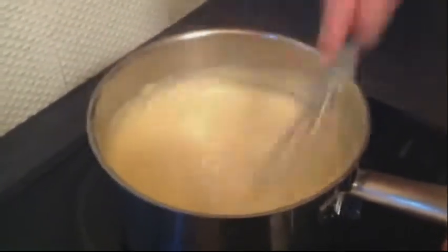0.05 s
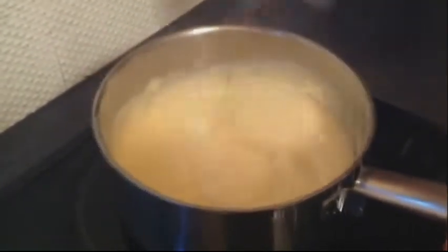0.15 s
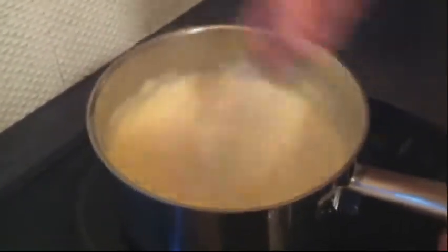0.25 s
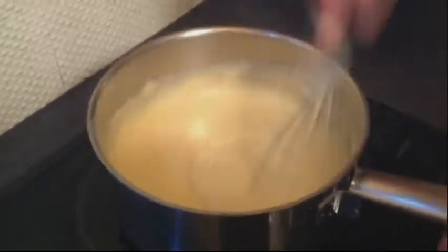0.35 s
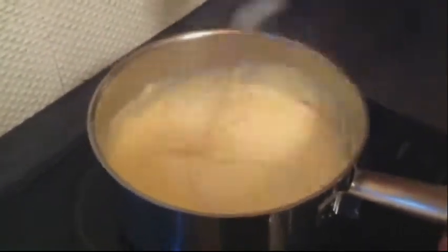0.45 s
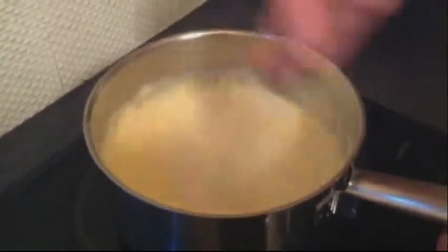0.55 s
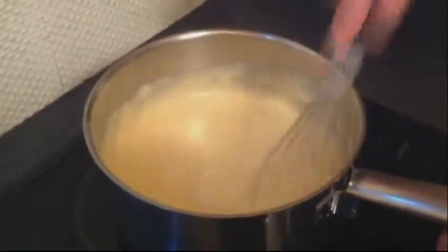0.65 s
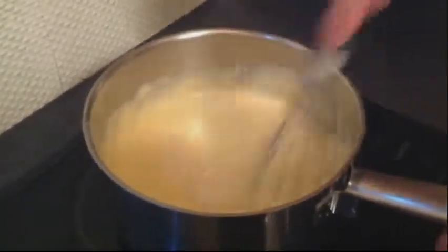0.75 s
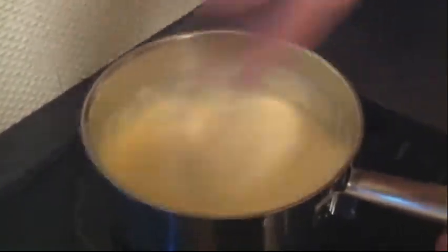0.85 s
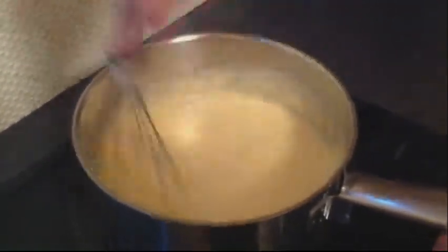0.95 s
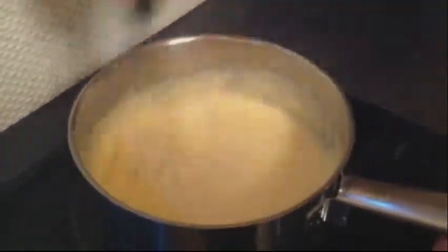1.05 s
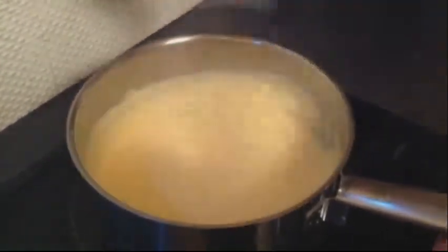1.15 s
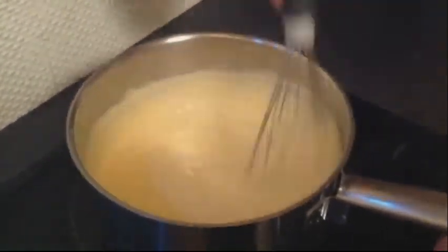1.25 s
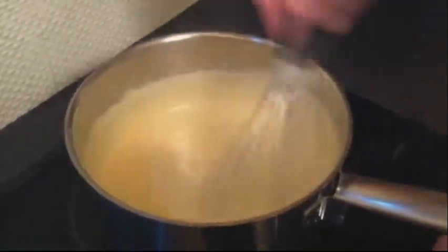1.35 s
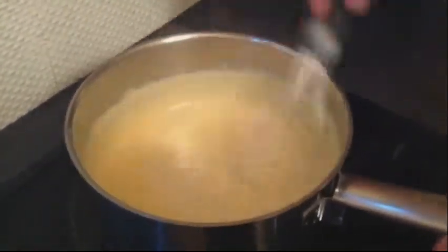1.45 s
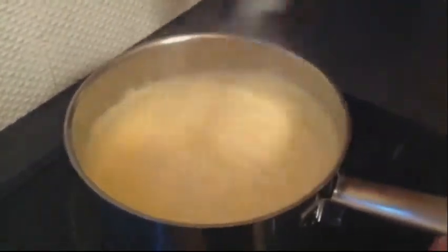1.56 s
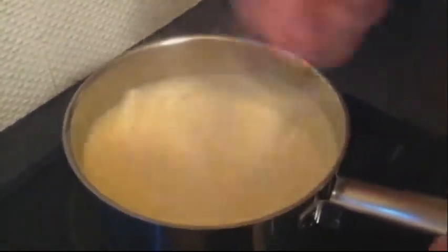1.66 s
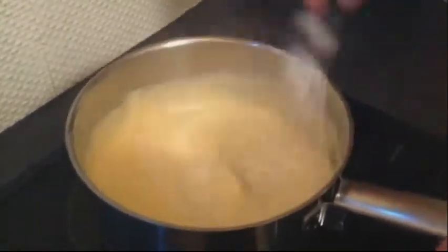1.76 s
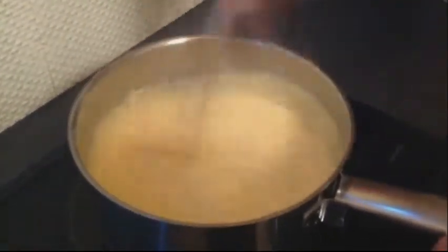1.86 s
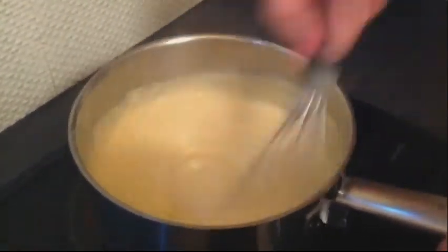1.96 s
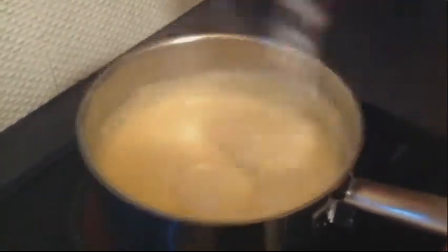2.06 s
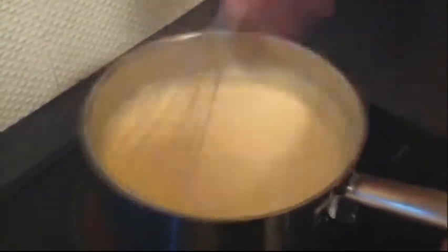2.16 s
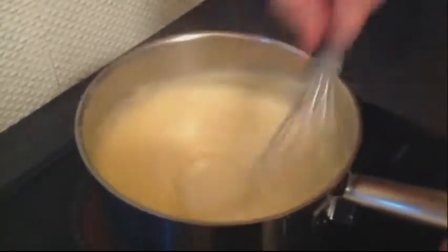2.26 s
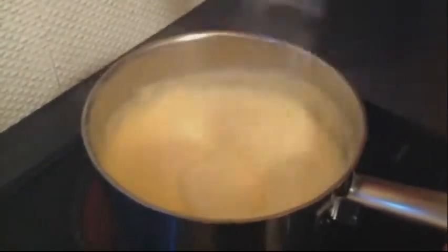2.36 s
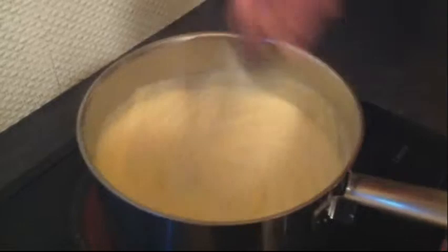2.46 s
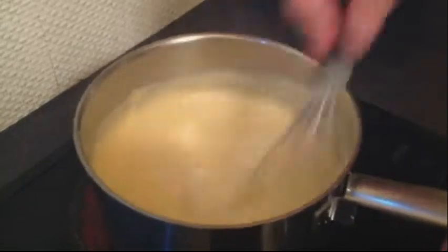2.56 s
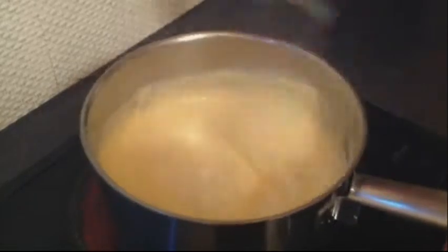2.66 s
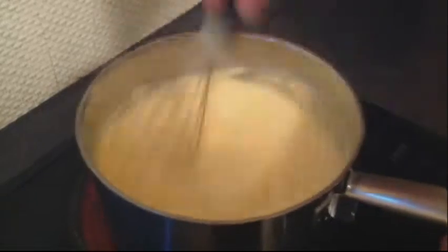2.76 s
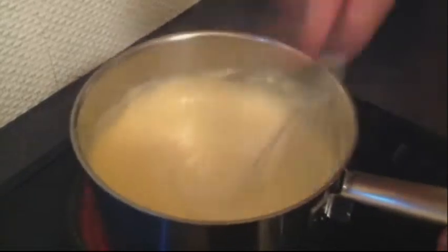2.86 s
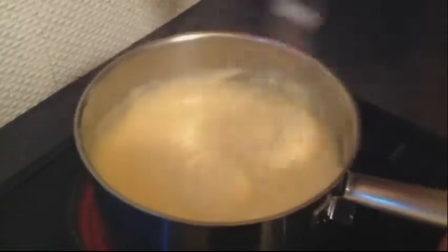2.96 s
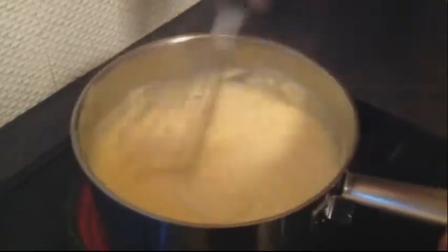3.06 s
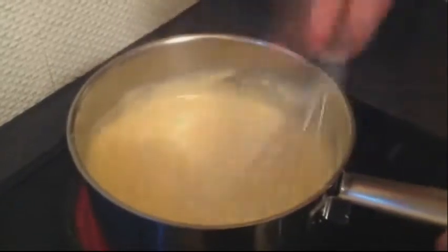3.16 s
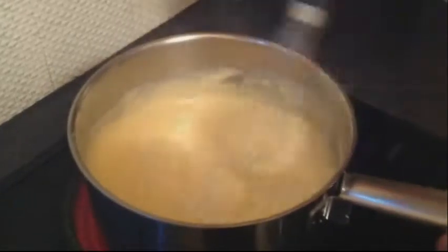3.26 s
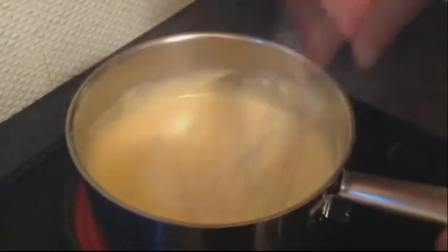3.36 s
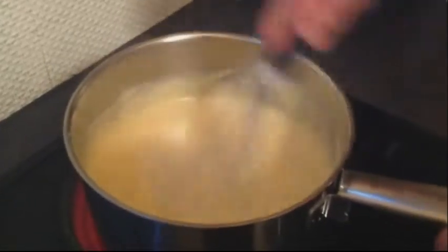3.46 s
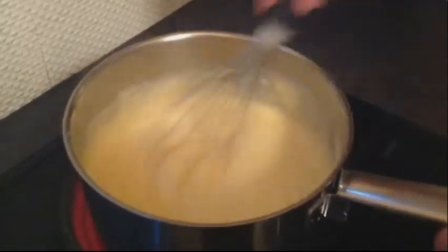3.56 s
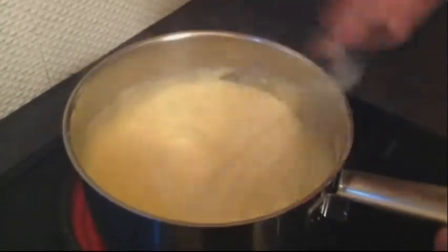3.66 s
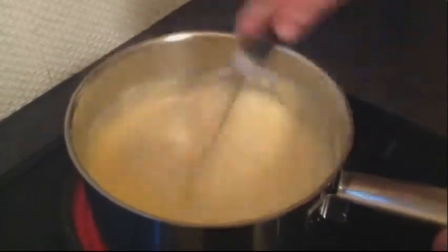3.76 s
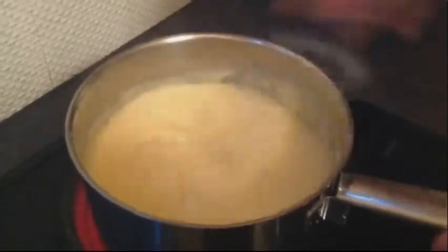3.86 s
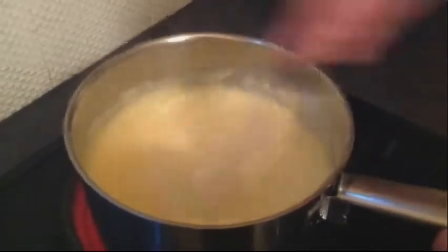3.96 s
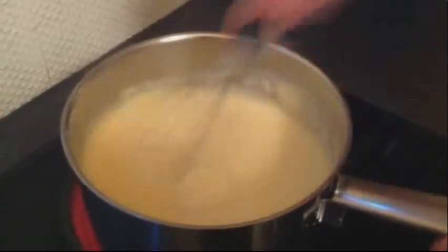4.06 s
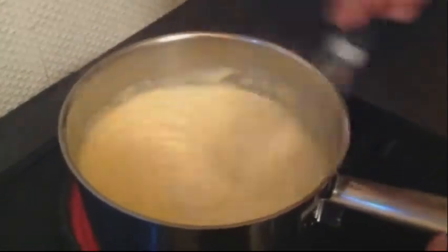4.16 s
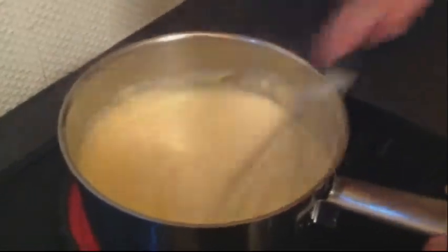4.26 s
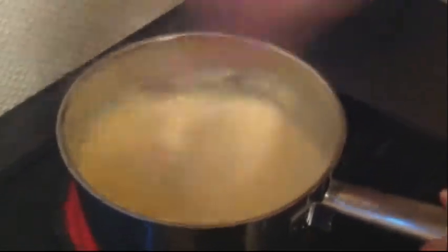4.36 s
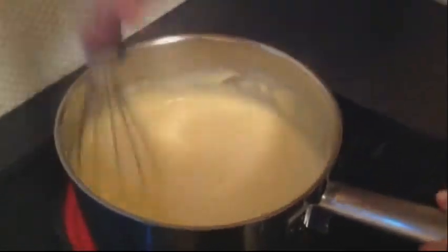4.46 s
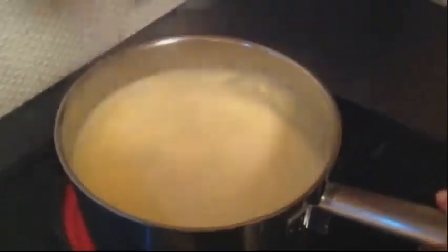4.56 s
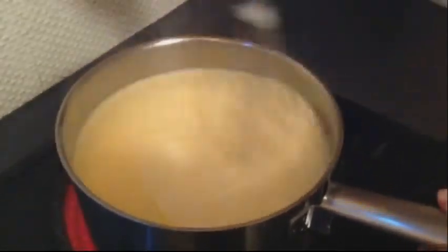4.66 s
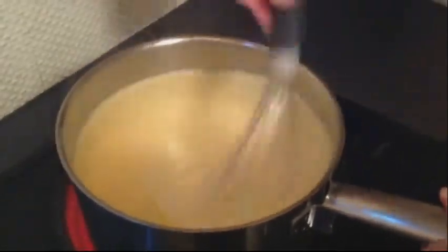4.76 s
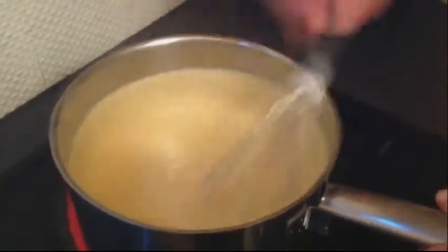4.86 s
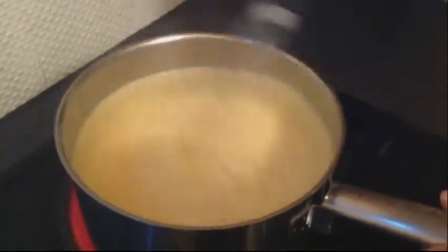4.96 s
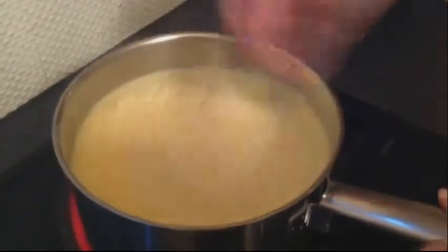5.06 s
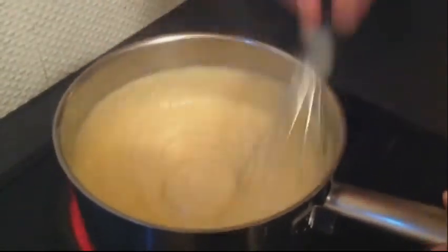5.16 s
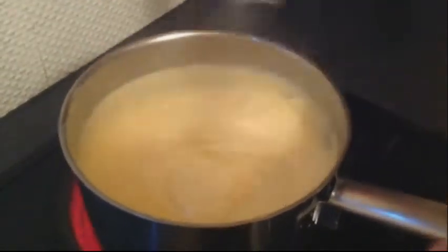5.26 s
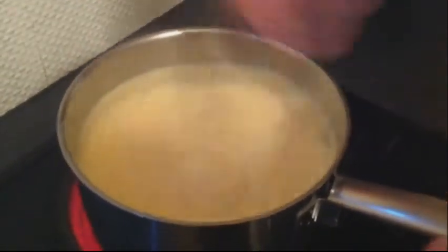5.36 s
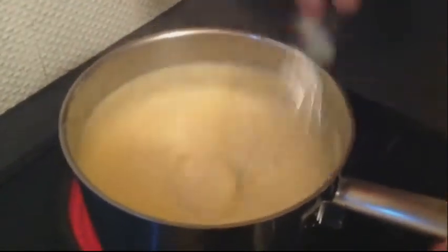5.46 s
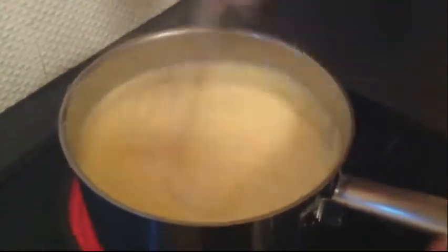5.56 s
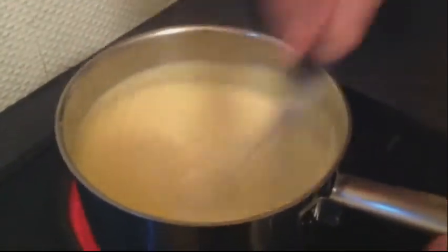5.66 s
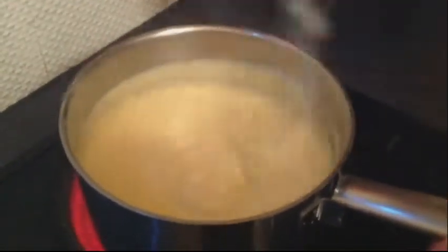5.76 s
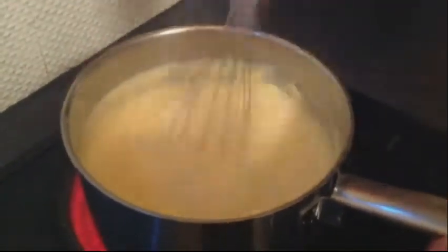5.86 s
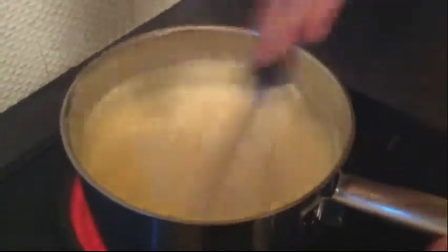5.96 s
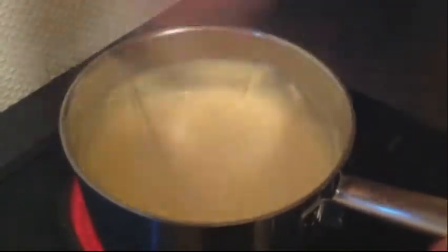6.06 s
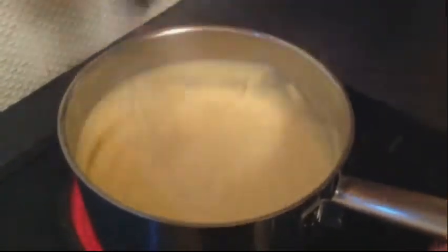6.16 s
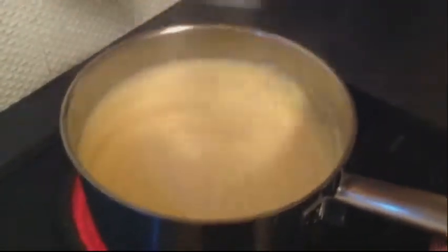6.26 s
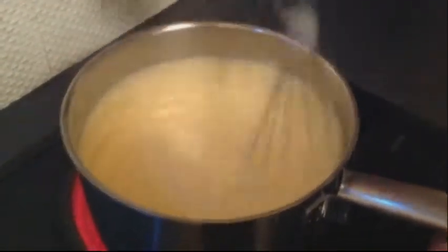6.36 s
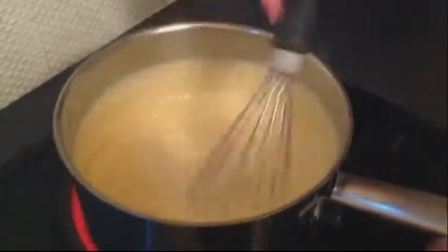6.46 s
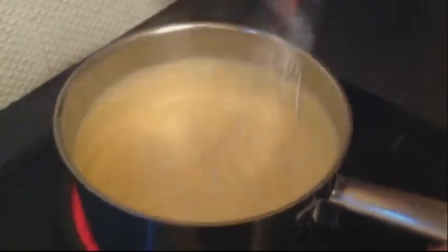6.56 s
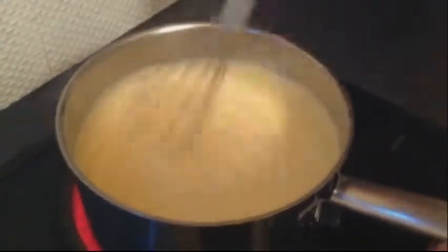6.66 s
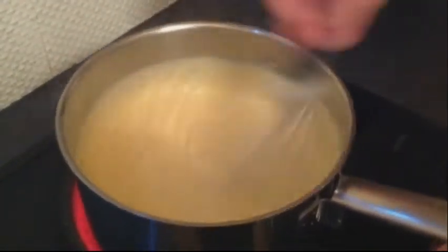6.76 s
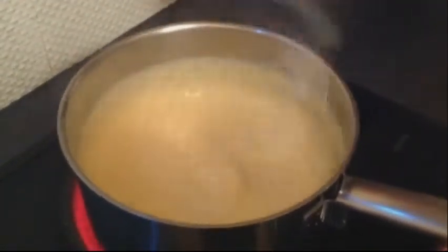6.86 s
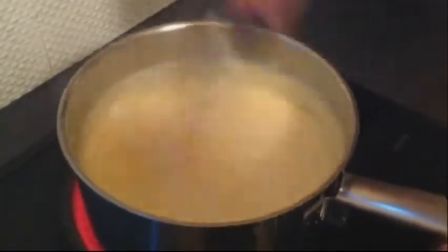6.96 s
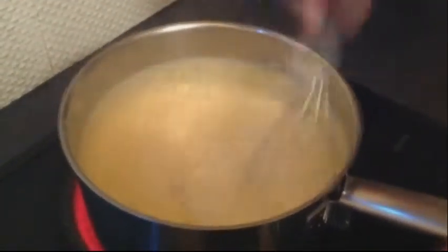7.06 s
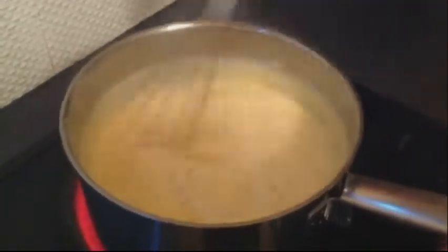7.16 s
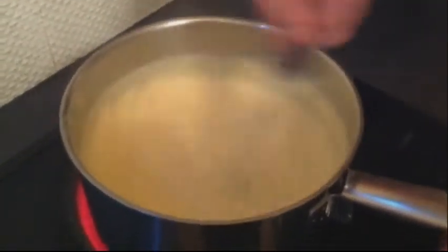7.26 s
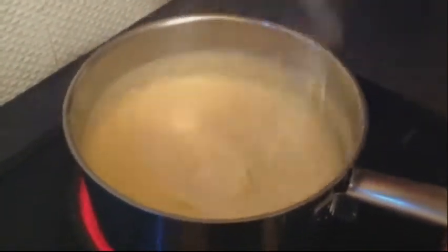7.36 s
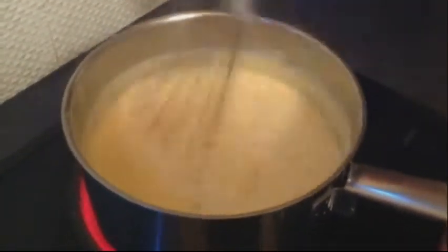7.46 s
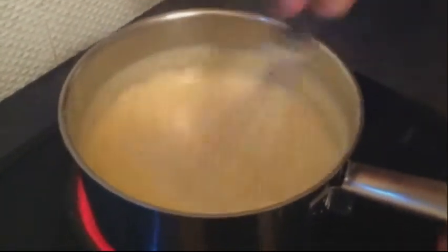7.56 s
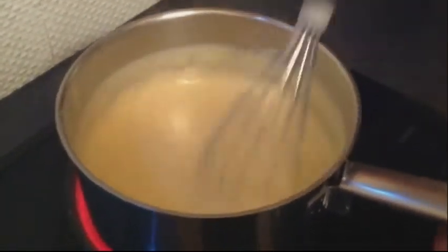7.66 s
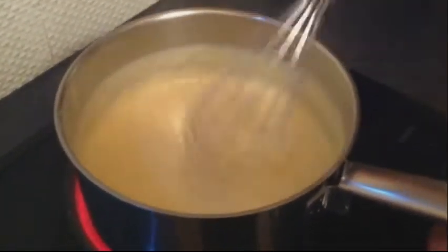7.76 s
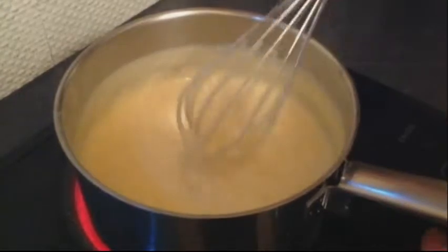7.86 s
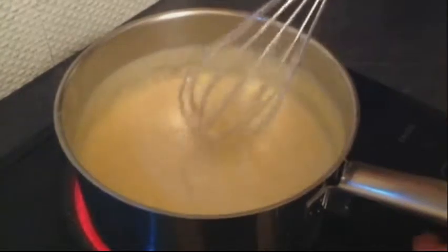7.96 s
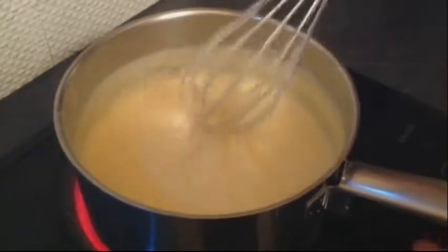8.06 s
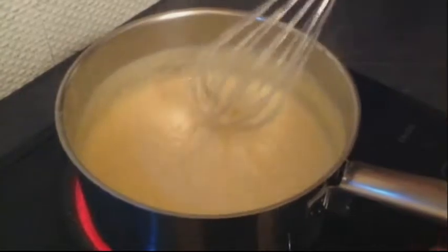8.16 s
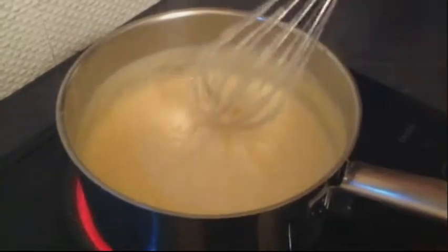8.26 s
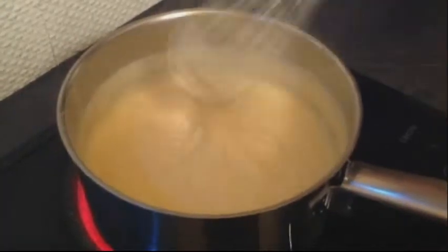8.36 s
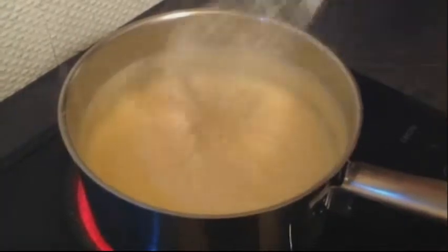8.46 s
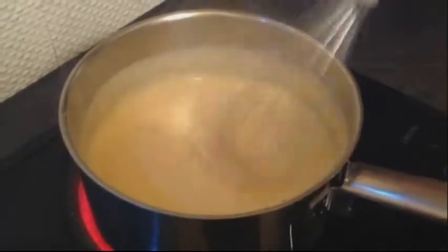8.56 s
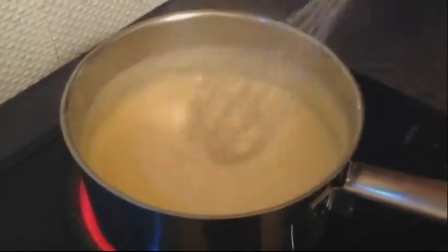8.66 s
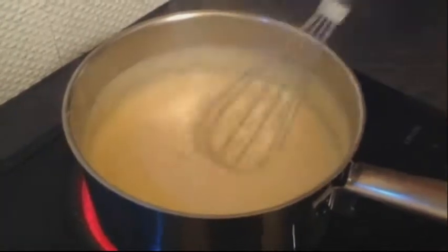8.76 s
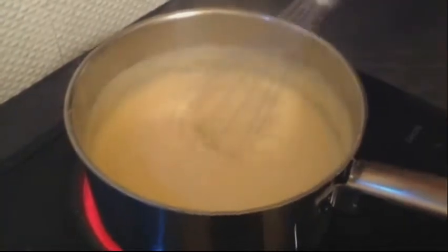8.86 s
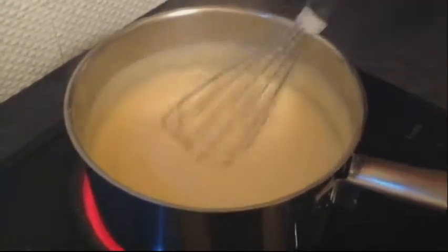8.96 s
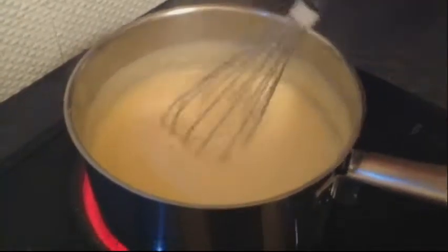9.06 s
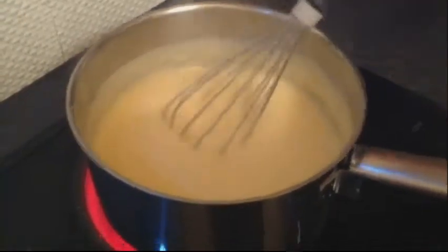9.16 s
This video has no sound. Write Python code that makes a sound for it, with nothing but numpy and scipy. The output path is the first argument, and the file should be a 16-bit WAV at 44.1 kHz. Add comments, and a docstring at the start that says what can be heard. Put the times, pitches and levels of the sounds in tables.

```python
"""A wire whisk beats thick cream in a steel saucepan on a glass hob, close by in a small kitchen.
Impacts excite the modes of the wires and the damped pan; sliding friction hisses along the bottom.
The cream churns, air pockets resonate in it as they close, and once the pan knocks on the hob.
Then the whisk is lifted: a soft scuff, the hum of the kitchen, and the whisk is set down in the pan,
where its wires vibrate freely. The room adds a short reverberation."""
import sys
import numpy as np
from scipy import signal
from scipy.fft import rfft, irfft, next_fast_len
from scipy.io import wavfile
from scipy.ndimage import uniform_filter1d, map_coordinates

SR = 44100
rng = np.random.default_rng(int(sys.argv[2]) if len(sys.argv) > 2 else 0)


def digitize_waveform(pressure):
    """Quantize a signal to 16-bit integers and store it at the path in sys.argv[1].

    Rows of a 2-D input are taken as channels; values are limited to [-1, 1].
    """
    field = np.atleast_2d(pressure).T
    bounded = np.clip(field, -1, 1)
    quanta = np.round(bounded * 32767).astype(np.int16)
    wavfile.write(sys.argv[1], SR, quanta)


N = 406594

# Wire impacts on the pan, in relative levels: (time [s], clack [dB], rim [dB], body [dB])
IMPACTS = [(0.0074, -14, -35, -30), (0.0977, -7.5, -26.5, -31.5), (0.268, -16.5, -44, -35),
           (0.2976, -13.5, -51, -37), (0.3789, -8.5, -27, -39), (0.3945, -17, -45, -45),
           (0.5747, -8.5, -33, -30), (0.662, -10, -23.5, -30), (0.8196, -28, -40, -54),
           (0.8495, -21, -39, -43), (0.8659, -17.5, -46, -42), (0.8736, -16.5, -29, -35),
           (0.913, -9, -25, -58), (0.962, -20.5, -30, -46), (1.0211, -8, -29, -36),
           (1.291, -23, -31.5, -53.5), (1.3777, -20.5, -49.5, -41.5), (1.3992, -22, -31.5, -60),
           (1.5018, -20, -29, -44), (1.545, -21.5, -63.5, -39.5), (1.6521, -10.5, -44, -30.5),
           (1.6823, -19, -59, -40), (1.779, -4, -18.5, -33), (1.827, -15, -40, -52), (1.926, -5, -25, -29),
           (2.0294, -5.5, -23.5, -30.5), (2.1103, -11, -32, -39.5), (2.1956, -8, -41.5, -29),
           (2.253, -17, -39, -37.5), (2.3038, -14, -50, -40), (2.3178, -11, -34.5, -37.5),
           (2.391, -14.5, -30, -49.5), (2.521, -6.5, -51, -29), (2.595, -6.5, -28, -32),
           (2.8029, -14, -63, -32.5), (2.837, -12.5, -58, -34), (2.9206, -6.5, -24, -35),
           (2.9394, -14, -31, -50), (3.102, -27.5, -40, -54), (3.246, -6.5, -28.5, -35),
           (3.3025, -17.5, -29.5, -49), (3.488, -4, -31.5, -29.5), (3.4976, -15, -21.5, -30),
           (3.9736, -14.5, -31, -47), (4.0157, -9, -29, -33), (4.2525, -15, -34, -57),
           (4.283, -19.5, -43, -50), (4.3099, -22, -31, -60), (4.3273, -19, -41, -44),
           (4.3824, -9.5, -52, -34), (4.3918, -10.5, -27.5, -35), (4.43, -10, -37, -57),
           (4.4668, -12.5, -50, -57), (4.4801, -12, -42, -36.5), (4.725, -18, -39, -43.5),
           (4.854, -18.5, -34, -45.5), (5.0854, -8.5, -32, -33), (5.2065, -16, -48, -40),
           (5.2757, -16, -24.5, -46.5), (5.3696, -10.5, -46, -33.5), (5.473, -4.5, -26, -31.5),
           (5.655, -6.5, -32.5, -33), (5.742, -7, -25.5, -32), (6.0168, -0.5, -20.5, -29.5),
           (6.0195, -7.5, -24.5, -45.5), (6.1229, -19, -38, -64), (6.1591, -15, -39, -47),
           (6.3721, -21, -46.5, -48), (6.4913, -27, -45, -51), (6.6278, -21.5, -28.5, -43),
           (6.7303, -13, -37.5, -36.5), (6.8639, -5.5, -24.5, -33.5), (7.0241, -9.5, -45, -32),
           (7.1054, -5.5, -21.5, -29.5), (7.2739, -12, -43, -37.5), (7.3777, -10, -27.5, -36.5),
           (7.9833, -43, -69, -58)]
# Modes of the pan, damped by the cream: (frequency [Hz], bandwidth [Hz], gain [dB])
RIM_MODES = [(1178, 20, -3), (1420, 260, 2), (1534, 52, 4.5), (1857, 54, 0.5), (2044, 46, 10),
             (2475, 340, 2), (2820, 170, 3)]
WALL_MODES = [(511, 30, -5), (602, 40, 4.5), (674, 55, 4.5), (782, 83, 3.5), (967, 170, -4.5)]
BOTTOM_MODES = [(143, 22, -1.5), (191, 37, -5.5), (289.4, 23.5, 3), (339.4, 30, -0.5), (444, 32, -6)]
# Spectral envelope of a wire clack: (frequency [Hz], gain [dB])
CLACK_SPECTRUM = [(300, -43), (1000, -16), (2300, -14), (3300, -5.5), (3900, -2), (4600, 0), (5300, -3),
                  (6100, -3), (7600, 0.5), (8600, -2.5), (9700, -5.5), (10800, -8), (15000, -11)]
BAND_LIMIT_HZ = 15400
LEAD_SAMPLES = 110  # light grazing before a strike lands


def amp(db):
    """Decibels to amplitude ratio."""
    return 10 ** (np.asarray(db) / 20)


def unit(x):
    """Normalise to rms 1."""
    return x / np.sqrt(np.mean(x ** 2) + 1e-20)


def unit_onset(x, samples):
    """Normalise each row to rms 1 over its first samples."""
    return x / np.sqrt(np.mean(x[..., :samples] ** 2, axis=-1, keepdims=True))


def along(points, hz):
    """Interpolate (frequency [Hz], value) points on a logarithmic frequency axis."""
    frequencies, values = np.transpose(points)
    return np.interp(np.log(hz + 1), np.log(frequencies + 1), values)


def fade(t, t60):
    """Exponential decay, 60 dB down after t60."""
    return np.exp(-np.log(1000) * t / t60)


def swell(start, attack, hold, t60):
    """An envelope with a linear rise, a plateau until hold and an exponential decay, all in seconds."""
    t = np.maximum(np.arange(N) / SR - start, 0)
    return np.minimum(t / attack, 1) * fade(np.clip(t - hold, 0, 2 * t60), t60)


def wobble(rate):
    """Smooth random modulation, rate knots a second."""
    return map_coordinates(rng.standard_normal(int(N * rate / SR) + 4), [np.arange(N) * rate / SR])


def sparse(rate, spread_db):
    """A Poisson train of unequal impulses, rate a second."""
    occurs = rng.random(N) < rate / SR
    return occurs * amp(spread_db * np.clip(rng.standard_normal(N), -2, 2)) * rng.choice([-1, 1], N)


def add(track, time, sound):
    """Superpose a sound on the track at a time in seconds."""
    start = max(round(time * SR), 0)
    part = track[start:start + len(sound)]
    part += sound[:len(part)]


def filtered(x, response):
    """Multiply the spectrum of x by a frequency response."""
    n = x.shape[-1]
    padded = 2 * next_fast_len(n // 2 + 4096)
    return irfft(rfft(x, padded) * response(np.fft.rfftfreq(padded, 1 / SR)), padded)[..., :n]


def coloured(x, points):
    """Minimum-phase filtering through (frequency [Hz], gain [dB]) points."""
    def response(hz):
        cepstrum = irfft(np.log(amp(along(points, hz))))
        half = len(cepstrum) // 2
        cepstrum[1:half] *= 2
        cepstrum[half + 1:] = 0
        return np.exp(rfft(cepstrum))
    return filtered(x, response)


def resonated(x, modes):
    """Forced vibration: x drives parallel second-order resonators of alternating polarity."""
    def response(hz):
        return sum((-1) ** k * amp(db) * 1j * hz * width / (centre ** 2 - hz ** 2 + 1j * hz * width)
                   for k, (centre, width, db) in enumerate(modes))
    return filtered(x, response)


def ring(modes, t):
    """Free vibration: a sum of damped sinusoids of random phase."""
    return sum(amp(db) * fade(t, t60) * np.sin(2 * np.pi * (hz * t + rng.random()))
               for hz, db, t60 in modes)


def patchy(x, depth_db, bins=3):
    """Spectral modulation: drifting peaks and dips of the given width."""
    spectra = signal.stft(x, nperseg=512)[2]
    field = uniform_filter1d(rng.standard_normal(spectra.shape), size=bins, axis=0)
    field = uniform_filter1d(field, size=14, axis=1)
    return signal.istft(spectra * amp(depth_db * unit(field)), nperseg=512)[1][:N]


def strikes():
    """Impact excitation: the wires clack, and their brief chatter drives the rim, wall and bottom."""
    t = np.arange(SR // 9) / SR
    clack = clacks(len(IMPACTS), t)
    chatter = rng.standard_normal(clack.shape) * fade(t, 0.026)
    rim = unit_onset(resonated(chatter, RIM_MODES), samples=500)
    wall = unit_onset(resonated(chatter, WALL_MODES), samples=600)
    bottom = unit_onset(resonated(chatter, BOTTOM_MODES), samples=900)
    out = np.zeros(N)
    for k, (time, clack_db, rim_db, body_db) in enumerate(IMPACTS):
        # A strike under the cream muffles the rim and shifts the sound from wall to bottom.
        lean_db = 2.5 - 0.172 * (body_db - rim_db)
        body = amp(body_db + lean_db - 7) * wall[k] + amp(body_db - lean_db - 6) * bottom[k]
        add(out, time + 0.0005 - LEAD_SAMPLES / SR, amp(clack_db - 11) * clack[k])
        add(out, time, amp(rim_db - 10) * rim[k] + body)
    return out


def clacks(hits, t, modes=420):
    """Convolution: each contact of a chattering loop repeats its impulse response, a crack and a ring."""
    wire_hz = (np.arange(modes) + rng.random(modes))[:, None] / modes * BAND_LIMIT_HZ
    wire_t60 = 0.055 * np.exp(0.061 * rng.standard_normal((modes, 1)))
    # The point of impact decides which groups of modes are excited.
    groups = amp(3 * unit(uniform_filter1d(rng.standard_normal((hits, modes)), size=20, axis=1)))
    weights = groups * rng.standard_normal((hits, modes))
    wires = weights @ (np.sin(2 * np.pi * wire_hz * t) * fade(t, wire_t60))
    crack = rng.standard_normal((hits, len(t))) * fade(t, 0.0047)
    response = unit_onset(wires, samples=220) + 0.87 * unit_onset(crack, samples=220)
    touching = rng.random(crack.shape) < 450 / SR
    contacts = touching * rng.uniform(-1, 0.7, crack.shape) * fade(t, 0.028)
    contacts[:, :LEAD_SAMPLES] *= 0.4
    contacts[:, LEAD_SAMPLES] = 1  # the loop lands
    rattle = signal.fftconvolve(response, contacts, axes=1)[:, :len(t)]
    return unit_onset(coloured(rattle, CLACK_SPECTRUM), samples=330)


def stirring():
    """Amplitude modulation: one stroke governs both the friction on the steel and the churning."""
    friction, brightness, churn = stroke()
    cream = churn * churning() + plops()
    return scraping(friction, brightness, churn) + friction * grazes() + cream


def stroke():
    """Incoherent addition: sweeps and digs sum in power to give scrape gain, brightness and cream gain."""
    # Sweeps along the bottom: (time [s], duration [s], scrape [dB], brightness [dB], cream [dB])
    sweeps = [(0.0, 0.2, -35.5, -4.5, -46), (0.203, 0.23, -36, 0.5, -42.5), (0.486, .1, -41.5, 8, -48),
              (0.59, .14, -36, -4.5, -57), (0.858, 0.14, -44.5, -10, -42.5), (1.025, 0.21, -34, 1, -54),
              (1.235, 0.19, -41.5, -4.5, -45), (1.515, .09, -39, 2.5, -57), (1.64, .11, -35.5, 3, -47.5),
              (1.778, 0.24, -37, 1.5, -46), (2.018, 0.21, -34.5, 2, -47.5), (2.208, 0.24, -34.5, 0.5, -48),
              (2.498, .17, -33.5, 2, -50), (2.674, 0.3, -36, 1, -48), (3.05, 0.091, -41, 5, -59),
              (3.157, 0.19, -37, 3, -49.5), (3.396, 0.25, -40, 3, -49), (3.675, .1, -40.5, -1, -46),
              (3.789, 0.093, -37, 6.5, -47.5), (3.949, 0.2, -35.5, 2, -43.5), (4.226, .07, -35.5, -4, -45),
              (4.386, .12, -38, -7, -59), (4.518, .18, -31.5, 3, -53), (4.736, 0.12, -36.5, -3.5, -45),
              (4.955, 0.36, -41, 2, -53), (5.068, 0.21, -33.5, -1, -47), (5.338, .09, -33.5, 0, -42.5),
              (5.428, .07, -42.5, 32, -59), (5.583, .06, -40.5, 6.5, -52), (5.67, .13, -35, 3, -47),
              (5.874, .11, -50, -2.5, -59), (6.12, .21, -37, -2, -56), (6.351, 0.16, -42.5, -4, -53.5),
              (6.618, 0.082, -47, 1, -52), (6.73, 0.13, -40.5, 6, -50), (6.952, 0.17, -38.5, 8, -48),
              (7.198, 0.22, -40, 3, -46.5), (7.457, 0.096, -44.5, -2, -57), (7.554, 0.065, -42, 0, -55)]
    scrape, weighted_db, cream = np.zeros((3, N))
    for time, duration, scrape_db, brightness_db, cream_db in sweeps:
        power = (amp(scrape_db) * swell(time, attack=0.04, hold=duration, t60=0.28)) ** 2
        scrape += power
        weighted_db += power * brightness_db
        cream += (amp(cream_db) * swell(time, attack=0.04, hold=duration, t60=0.43)) ** 2
    # After a strike the wires dig in, with a dull scrape and a shove of cream.
    times, clack_db, _, body_db = np.transpose(IMPACTS)
    dig = digs(times, clack_db - 30.5, t60=0.32)
    shove = digs(times, body_db - 9.5, t60=0.35)
    dig_brightness_db = -9.5
    brightness = amp((weighted_db + dig_brightness_db * dig) / (scrape + dig + 1e-14))
    return np.sqrt(scrape + dig), brightness, np.sqrt(cream + shove)


def digs(times, levels_db, t60):
    """The power envelope of a short, exponentially decaying push after each strike."""
    out, push = np.zeros(N), swell(0, attack=0.014, hold=0.014, t60=t60)[:SR]
    for time, db in zip(times, levels_db):
        add(out, time, (amp(db) * push) ** 2)
    return out


def scraping(friction, brightness, churn):
    """Sliding friction: wires hiss on steel, duller when pressed hard, and small ticks excite the pan."""
    # Spectral envelope of wire sliding on steel: (frequency [Hz], gain [dB])
    friction_spectrum = [(100, -41.5), (400, -29.5), (1000, -16.5), (1600, -10.5), (2400, -19.5),
                         (3200, -9), (3600, -9), (4700, -5.5), (6000, -6), (8500, -4), (11000, -5.5),
                         (15000, -11.5)]
    t = np.arange(SR // 25) / SR
    grit = rng.standard_normal(N) + 0.75 * unit(sparse(900, spread_db=5))
    grit = patchy(patchy(grit, depth_db=2.1), depth_db=1.8, bins=26)
    hiss = unit(wall_echo(coloured(grit, friction_spectrum)))
    dull = filtered(hiss, lambda hz: 1 / (1 + (hz / 8000) ** 6))
    tilt = np.sqrt(np.maximum(brightness, 0.25))
    hiss = dull / tilt + (hiss - dull) * tilt
    tick_power = signal.fftconvolve(sparse(80, spread_db=3.5) ** 2, fade(t, 0.01))[:N]
    ticks = np.sqrt(np.abs(tick_power)) * rng.standard_normal(N)
    wire_ticks = amp(-9) * unit(coloured(ticks, CLACK_SPECTRUM))
    pan_ticks = amp(-9) * unit(resonated(ticks, WALL_MODES + RIM_MODES))
    return friction * (hiss * amp(0.5 + 0.9 * wobble(45)) + wire_ticks) + churn * pan_ticks


def wall_echo(x):
    """Comb filtering: a dull reflection from the pan wall interferes, its delay moving with the whisk."""
    delay_s = 0.00033 * np.exp(0.25 * wobble(9))
    dull = filtered(x, lambda hz: 1 / (1 + (hz / 3500) ** 4))
    return x + np.interp(np.arange(N) - delay_s * SR, np.arange(N), dull)


def grazes(count=24):
    """Glancing impacts: single wires flick the pan at random moments."""
    out = np.zeros(N)
    for when, clack in zip(rng.random(count), clacks(count, np.arange(SR // 9) / SR)):
        add(out, when * N / SR, clack)
    return amp(-2.5) * out


def churning():
    """Flow noise: the cream sloshes unevenly, with small air pockets sounding in it."""
    # Spectral envelope of the moving cream: (frequency [Hz], gain [dB])
    flow_spectrum = [(30, -25), (75, -40.5), (130, -1.5), (185, -14), (240, -16.5), (305, 4.5),
                     (410, -14.5), (800, -2.5), (1500, -12.5), (4000, -11)]
    flow = unit(coloured(patchy(rng.standard_normal(N), depth_db=5.5), flow_spectrum))
    slosh = flow * amp(6 * np.tanh(wobble(35)))
    return amp(-5.5) * slosh + amp(-6.5) * gloops()


def gloops(count=300):
    """Bubble resonance: air pockets close in the thick cream with low, damped notes that rise a little."""
    out, t = np.zeros(N), np.arange(SR // 12) / SR
    for when, pitch, strength in rng.random((count, 3)):
        hz = 210 * 2.6 ** pitch
        t60 = 16 / hz
        note = np.sin(2 * np.pi * hz * t * (1 + 0.054 * t / t60))
        add(out, when * N / SR, amp(9.8 * strength) * note * fade(t, t60) * (1 - fade(t, 0.0076)))
    return unit(out)


def plops():
    """Bubble resonance: a few large air pockets close with a round, rising note."""
    # Large air pockets: (time [s], relative level [dB], starting frequency [Hz])
    pockets = [(2.792, -29.5, 333), (2.843, -28, 331), (4.039, -29, 360), (4.491, -31, 303),
               (5.173, -31, 305)]
    rise_per_s = 0.7  # fraction of the starting frequency
    out, t = np.zeros(N), np.arange(SR // 5) / SR
    for time, db, hz in pockets:
        note = np.sin(2 * np.pi * hz * t * (1 + rise_per_s * t / 2))
        add(out, time, amp(db + 1) * note * fade(t, 0.12) * (1 - fade(t, 0.03)))
    return out


def knock():
    """Impact excitation: the pan tips and drops back on the glass, then rings and shudders."""
    # Spectral envelope of steel striking glass: (frequency [Hz], gain [dB])
    impact_spectrum = [(30, -34), (70, -28), (120, -2.5), (170, 2), (250, -3), (350, 2.5), (520, 0.5),
                       (700, -3), (1000, -9.5), (1380, 1.5), (1650, -11.5), (2030, 5.5), (2600, -9.5),
                       (5000, -14), (12000, -11.5), (15000, -24)]
    # Modes of the whole pan on the hob: (frequency [Hz], relative level [dB], t60 [s])
    pan_modes = [(174.5, 3, 0.28), (343, 2, 0.37), (596, 4, 0.24), (1410, 2, .16), (1870, -5, .15),
                 (1950, -9, 0.14), (2060, -9, .14), (2480, -8, .15)]
    out, t = np.zeros(N), np.arange(SR // 2) / SR
    burst = rng.standard_normal(len(t)) * fade(t, 0.036) * (1 - fade(t, 0.0148))
    impact = unit_onset(coloured(burst, impact_spectrum), samples=440)
    chatter = rng.standard_normal(len(t)) * fade(t, 0.2)
    shudder = unit_onset(resonated(chatter, BOTTOM_MODES + WALL_MODES), samples=1500)
    add(out, 4.9672, amp(-13) * impact + amp(-37.5) * ring(pan_modes, t))
    add(out, 4.97, amp(-33.5) * shudder)
    return out


def set_down():
    """Free vibration: the loosely held whisk touches the pan with a dry tick and rings on."""
    # Contacts with the pan: (time [s], relative level [dB])
    touches = [(8.861, -53), (9.029, -39.5)]
    # Modes of the free wires: (frequency [Hz], relative level [dB], t60 [s])
    wire_modes = [(140.5, 2.5, 0.2), (283.5, -1.5, 0.2), (1080, 3, 0.075), (1149, -1, 0.28),
                  (1220, -5, 0.21), (3550, -8, 0.13)]
    tick_spectrum = [(100, 2), (1500, -1), (6000, 3), (15000, 2)]  # (frequency [Hz], gain [dB])
    out, t = np.zeros(N), np.arange(SR // 2) / SR
    for time, db in touches:
        burst = rng.standard_normal(len(t)) * fade(t, 0.08)
        tick = unit_onset(coloured(burst, tick_spectrum), samples=220)
        wires = ring(wire_modes, t) * (1 - fade(t, 0.0094))
        add(out, time, amp(db) * (amp(8.5) * tick + wires))
    return out


def scuff():
    """A soft scuff beside the stove: one damped mode bumps, then friction noise swishes briefly."""
    # Envelope of the swish: (time [s], level [dB])
    envelope = [(8.19, -90), (8.215, -55), (8.235, -43.5), (8.255, -47), (8.27, -51.5), (8.31, -50.5),
                (8.36, -70), (8.45, -85)]
    # Spectral envelope of the swish: (frequency [Hz], gain [dB])
    swish_spectrum = [(200, -34), (450, 0), (650, -0.5), (1400, -2.5), (2000, -3.5), (2650, 4.5),
                      (3300, -1.5), (6000, -7.5), (14000, -22.5)]
    times, levels_db = np.transpose(envelope)
    gain = amp(np.interp(np.arange(N) / SR, times, levels_db, right=-120))
    out = gain * unit(coloured(patchy(rng.standard_normal(N), depth_db=5), swish_spectrum))
    t = np.arange(SR // 10) / SR
    bump = ring([(181, 0, 0.053)], t) * (1 - fade(t, 0.036))
    add(out, 8.19, amp(-35) * bump)
    return out


def reverberation(x, block=11025):
    """Diffuse reflection from the walls; the echo pattern changes as hand and whisk move."""
    # Reverberation time of the kitchen: (frequency [Hz], t60 [s])
    decay_times = [(150, 0.51), (600, 0.43), (3000, 0.39), (8000, 0.25), (15000, 0.15)]
    out = np.zeros(N)
    for start in range(0, N, block):
        hz, t, spectra = signal.stft(rng.standard_normal(SR // 2), SR, nperseg=256)
        decaying = spectra * fade(t, along(decay_times, hz)[:, None]) * (1 - fade(t, 0.003))
        tail = signal.istft(decaying, SR, nperseg=256)[1]
        add(out, start / SR, signal.fftconvolve(x[start:start + block], tail / np.linalg.norm(tail)))
    return coloured(out, [(200, -6), (700, -5), (3000, -10), (8000, -14.5), (15000, -1)])


def background():
    """Ambient noise: broadband kitchen air and the tonal hum of an appliance."""
    # Partials of the hum: (frequency [Hz], rms level [dB])
    partials = [(100, -69), (200, -71), (292, -68.5)]
    # Spectral envelope of the still room: (frequency [Hz], gain [dB])
    air_spectrum = [(25, -42.5), (70, -41), (110, -19), (155, -3.5), (230, -9), (310, -4.5), (420, -14.5),
                    (640, -11), (900, -16), (2000, -16), (5000, -22.5), (15000, -29)]
    t = np.arange(N) / SR
    hum = sum(amp(db + 0.8 * wobble(5.7)) * np.sqrt(2) * np.sin(2 * np.pi * hz * t)
              for hz, db in partials)
    return hum + amp(-58.5) * unit(coloured(rng.standard_normal(N), air_spectrum))


def scene():
    """Superposition of the direct sound at the stove, its reverberation and the ambient noise."""
    direct = strikes() + stirring() + knock() + set_down() + scuff()
    return (direct + reverberation(direct) + background())[None]


def record(dry):
    """Soft saturation rounds the highest peaks, and a steep low-pass filter limits the band."""
    rounded = dry / (1 + np.abs(dry / 0.85) ** 6) ** (1 / 6)
    return filtered(rounded, lambda hz: 1 / np.sqrt(1 + (hz / BAND_LIMIT_HZ) ** 200))


dry = scene()
out = record(dry)
digitize_waveform(out)
```